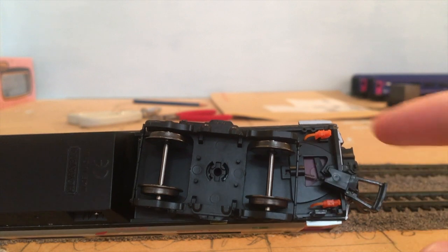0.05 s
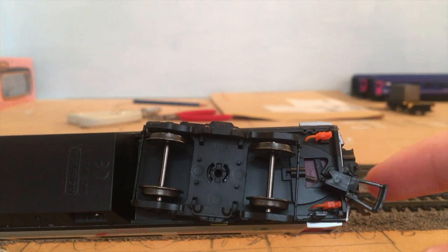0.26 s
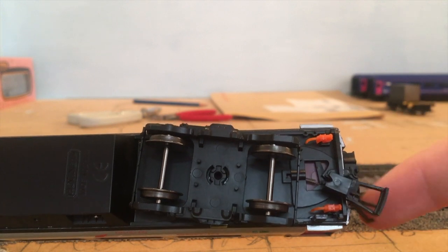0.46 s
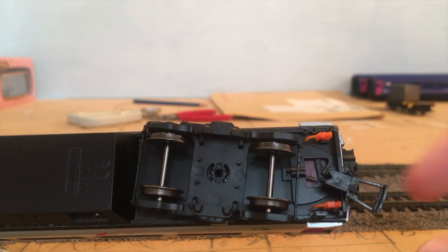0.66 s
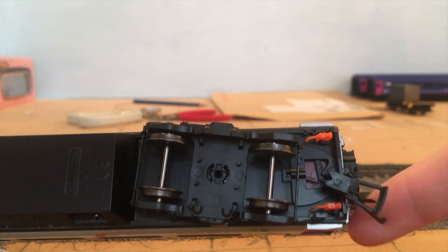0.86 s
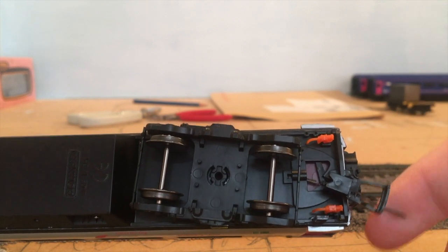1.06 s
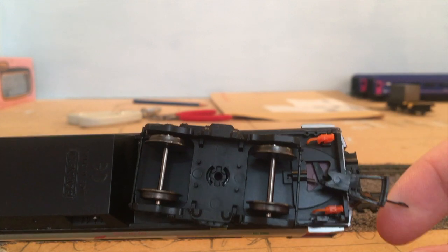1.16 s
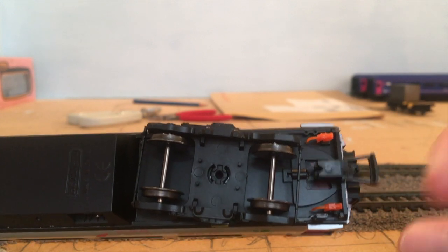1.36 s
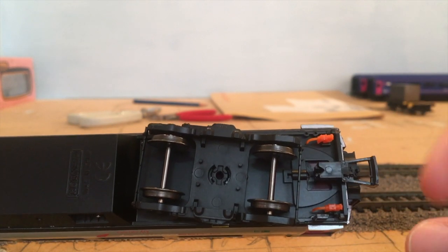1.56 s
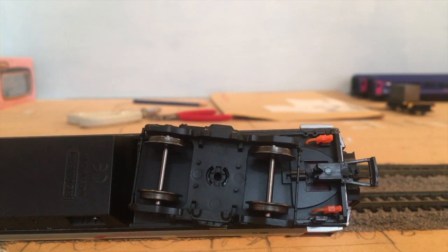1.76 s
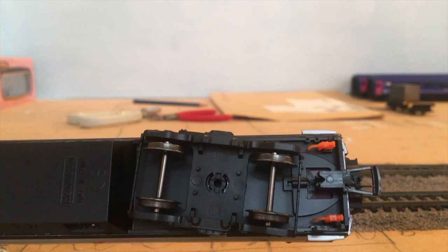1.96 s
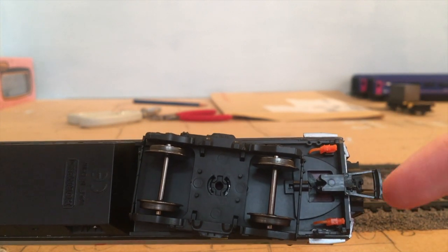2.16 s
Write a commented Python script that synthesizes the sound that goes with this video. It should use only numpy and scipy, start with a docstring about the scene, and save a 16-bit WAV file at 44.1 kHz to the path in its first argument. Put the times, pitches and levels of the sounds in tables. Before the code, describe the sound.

Small plastic clicks as a fingertip pushes a sprung model coach coupling that snaps back

```python
"""In a small room with a low hum, a fingertip pushes the sprung plastic coupling of a model coach aside.
The finger rubs as coloured noise; the arm scrapes in its guide as uneven noise sent through resonances.
Each contact clicks as short fading noises: a hollow body knock, a snap, a bright edge and after-rings.
The arm snaps back with a low thump, a soft scuff fades, and one faint high tick comes last.
The hum is two sine tones over noise for rumble and air; fading noise gives the desk and room echoes."""
import sys
import numpy as np
from scipy import signal
from scipy.fft import rfft, irfft, next_fast_len
from scipy.io import wavfile
from scipy.ndimage import map_coordinates

SR = 44100
rng = np.random.default_rng(int(sys.argv[2]) if len(sys.argv) > 2 else 0)


def store_wav(level_fs):
    """Save 16-bit WAV to argv[1]."""
    pcm = np.round(np.clip(np.atleast_2d(level_fs), -1, 1) * 32767)
    wavfile.write(sys.argv[1], SR, pcm.T.astype(np.int16))


N = 96799  # length in samples
TOP_HZ = 16650  # nothing sounds from here up
ATTACK_S = 0.00098  # rise time of clicks, scuff and tick


def amp(db):
    """Turn decibels into a gain."""
    return 10 ** (np.asarray(db) / 20)


def unit(x):
    """Scale to an rms (average strength) of 1."""
    return x / np.sqrt(np.mean(x ** 2) + 1e-20)


def along(points, hz):
    """Read a curve of (f/Hz, value) points, with frequency on a log axis."""
    f, value = np.transpose(points)
    return np.interp(np.log(hz + 1), np.log(f + 1), value)


def filtered(x, response):
    """Multiply the spectrum of x by a response that depends on frequency."""
    size = next_fast_len(N + SR // 2)  # room to spare, so that the end does not wrap to the start
    spectrum = rfft(x, size) * response(np.fft.rfftfreq(size, 1 / SR))
    return irfft(spectrum, size)[:N]


def noise(colour):
    """Make noise of rms 1 whose spectrum follows (f/Hz, level/dB) points."""
    white = rng.standard_normal(N)
    return unit(filtered(white, lambda hz: amp(along(colour, hz)) * (hz < TOP_HZ)))


def wobble(rate):
    """Draw a smooth random curve through `rate` random points a second."""
    points = rng.standard_normal(int(N * rate / SR) + 4)
    return map_coordinates(points, [np.arange(N) * rate / SR])


def dying(t, t60):
    """Stay full until t = 0, then fall by 60 dB in every t60 seconds."""
    return np.exp(-np.log(1000) * np.maximum(t, 0) / t60)


def strokes(rows, fade_s):
    """Shape the gain of sliding movements: each is a straight ramp in dB with soft ends."""
    t = np.arange(N) / SR
    gain = np.zeros(N)
    for start, end, first_db, last_db in rows:
        ramp = amp(np.interp(t, [start, end], [first_db, last_db]))
        gain += ramp * np.clip(np.minimum(t - start, end - t) / fade_s + 0.5, 0, 1)
    return gain


def resonances(peaks, f):
    """Add up the responses of resonances given as (f/Hz, width/Hz, level/dB)."""
    return sum(amp(db) * 1j * f * width / (centre * centre - f * f + 1j * f * width)
               for centre, width, db in peaks)


def ringing(peaks, size=16384):
    """Make a short loop of noise sent twice through resonances, which deepens the valleys between them."""
    response = resonances(peaks, np.fft.rfftfreq(size, 1 / SR)) ** 2
    return unit(irfft(rfft(rng.standard_normal(size)) * response))


def background():
    """A wavering low hum and a mains tone of fixed pitch that swells and fades lie over rumble and air."""
    # path of the hum: t/s, low hum f/Hz, low hum level/dB before its waver, mains level/dB before a lift
    hum_path = [(0.0, 48.5, -42.5, -63), (0.16, 46, -45, -73), (0.2, 49.2, -44.5, -62.5),
                (1.43, 48.23, -51.5, -53.5), (1.58, 46.14, -50.5, -55.5), (1.63, 49, -43, -50.5),
                (1.71, 53, -53, -54.5), (2.19, 50.25, -45.5, -57.5)]
    # noise colours: f/Hz, relative level/dB
    air_colour = [(100, 3.5), (150, 0), (260, 0.5), (500, -6.5), (1000, -12.5), (2000, -16.5), (4000, -21),
                  (8000, -24.5), (15500, -27.5)]
    rumble_colour = [(15, -10), (33, -0.5), (50, 7), (75, 2.5), (110, -4), (150, -27), (400, -46.5)]
    mains_hz, mains_lift_db = 100.8, 0.5
    waver_db, waver_rate = 2, 10  # typical size, random points per second

    times, *columns = np.transpose(hum_path)
    t = np.arange(N) / SR
    hz, low_db, mains_db = [np.interp(t, times, column) for column in columns]
    low = amp(low_db + waver_db * wobble(waver_rate)) * np.sin(2 * np.pi * np.cumsum(hz) / SR)
    mains = amp(mains_db + mains_lift_db) * np.sin(2 * np.pi * mains_hz * t)
    hum = np.sqrt(2) * (low + mains)  # sqrt(2) makes the tone levels rms levels
    return hum + amp(-60.5) * noise(air_colour) + amp(-52.5) * noise(rumble_colour)


def rubs():
    """Skin drags unevenly over the coupling, so the strength of its noise trembles."""
    # rubs of the fingertip: start t/s, end t/s, first level/dB, last level/dB
    rub_times = [(.02, .06, -57.5, -75), (1.083, 1.115, -58, -57.5), (1.13, 1.165, -58, -62.5),
                 (1.245, 1.27, -61.5, -56), (1.315, 1.356, -44.5, -45.5)]
    # colour of skin on plastic: f/Hz, relative level/dB
    skin_colour = [(150, -26.5), (500, 6.5), (950, 1.5), (1500, 2.5), (2250, 3.5), (3000, -9), (4000, -5.5),
                   (6500, -16.5), (8500, -5), (10500, -16.5), (16000, -20.5)]
    uneven_db, uneven_rate = 3.8, 250  # typical size, random points per second
    drag = unit(noise(skin_colour) * amp(uneven_db * wobble(uneven_rate)))
    return strokes(rub_times, fade_s=0.012) * drag


def clicks():
    """Each contact holds for a few milliseconds of chatter, then the body and the arm ring on and fade."""
    # contacts of the arm: t/s, body knock level/dB, snap level/dB, bright edge level/dB,
    # after-ring level/dB, chatter length/s, ring f/Hz
    contacts = [(0.045, -56.5, -52, -51.5, -59.5, 0.0013, 2125),
                (0.205, -58.5, -60, -74, -60.5, 0.0059, 2070), (0.4688, -44, -33, -38, -46, 0.0018, 2653),
                (0.54, -53.5, -45, -49.5, -53.5, 0.0043, 2070),
                (0.782, -88, -59, -46.5, -53.5, 0.0028, 2289), (0.8522, -46.5, -30, -37, -43, 0.0022, 2587),
                (0.9638, -44.5, -32, -29, -42, 0.0013, 2560), (0.9736, -41, -28.5, -47, -33, 0.0018, 2295),
                (1.088, -64, -49.5, -56, -68, 0.0019, 1740),
                (1.1037, -41.5, -53.5, -56, -49.5, 0.0024, 2680),
                (1.1899, -40.5, -51.5, -66, -48.5, 0.0011, 2100),
                (1.24, -44.5, -59.5, -58, -56, 0.0031, 2150),
                (1.329, -50.5, -44, -51.5, -38.5, 0.0013, 2155),
                (1.3562, -29.5, -24.5, -18, -29, 0.0037, 2079),
                (1.3686, -37.5, -26, -20, -35, 0.0043, 2493), (1.376, -41.5, -25, -22.5, -35, 0.0023, 2430),
                (1.4225, -75, -32.5, -33.5, -45, .0016, 2290),
                (1.619, -60, -61.5, -66.5, -63.5, 0.0075, 2140), (1.691, -48, -62, -64, -76, 0.0021, 2020)]
    # colours of the parts of a click: f/Hz, relative level/dB
    body_colour = [(100, -53.5), (190, -8), (270, -34.5), (400, 2), (660, 1.5), (800, -2.5), (1030, 6),
                   (1400, -2.5), (2200, -4.5), (4000, -36.5)]
    snap_colour = [(600, -44), (1400, -1), (2500, 6.5), (3100, 0.5), (3800, 5.5), (4900, 0), (5900, 5.5),
                   (8000, -17.5), (14000, -47)]
    edge_colour = [(2500, -34.5), (5500, -12.5), (7050, 4), (7900, -1.5), (8900, 7), (10300, -6.5),
                   (12100, 5), (13200, -1.5), (14000, -10), (15500, -8)]
    # resonances of the hollow coach body, then of the coupling and bogie:
    # f/Hz, width/Hz, relative level/dB for one of the two passes
    shell_peaks = [(656, 110, -1), (902, 90, 3.5), (1120, 160, 0)]
    arm_peaks = [(1700, 250, -4), (3650, 150, -5), (5860, 350, -10), (7330, 200, -6.5), (8850, 350, -13),
                 (12080, 230, -12)]
    bend_width_hz, bend_db = 110, 4  # main resonance of the arm; its pitch follows the bend
    body_t60, shell_t60, snap_t60, edge_t60, arm_t60 = 0.036, 0.06, 0.016, 0.0095, 0.049  # s
    shell_db = -8.5  # shell ring against the body knock

    out = np.zeros(N + SR)
    t = np.arange(SR // 5) / SR
    rise = 1 - np.exp(-t / ATTACK_S)
    body, snap, edge = noise(body_colour), noise(snap_colour), noise(edge_colour)
    shell = ringing(shell_peaks)
    for start, body_db, snap_db, edge_db, ring_db, chatter_s, ring_hz in contacts:
        at = round(start * SR)
        arm = ringing(arm_peaks + [(ring_hz, bend_width_hz, bend_db)])
        layers = [(body, body_t60, body_db), (shell, shell_t60, body_db + shell_db),
                  (snap, snap_t60, snap_db), (edge, edge_t60, edge_db), (arm, arm_t60, ring_db)]
        for grain, t60, db in layers:
            shape = rise * dying(t - chatter_s, t60)
            piece = np.resize(np.roll(grain, -at), len(t))  # a different stretch of noise each time
            strength = np.sqrt(np.mean(shape ** 2))  # evens out the luck of the draw
            out[at:at + len(t)] += amp(db) * strength * unit(shape * piece)
    return out[:N]


def slides():
    """Uneven slips of plastic on plastic excite the guide, whose resonances drift in strength."""
    # slides of the arm: start t/s, end t/s, first level/dB, last level/dB
    slide_times = [(.37, .4, -65, -59), (.4, .445, -54, -54), (.445, .468, -56, -42.5),
                   (.783, .83, -48, -53), (.832, .853, -47, -39.5)]
    # resonances of the guide: f/Hz, width/Hz, relative level/dB before the drift
    guide_peaks = [(3280, 230, -1), (3760, 140, 9.5), (6080, 380, -4.5), (6900, 130, -5), (9000, 700, -13),
                   (11400, 310, 2.5)]
    # colour of the gritty scrape: f/Hz, relative level/dB
    grit_colour = [(300, -2), (2000, 0), (5000, -13.5), (10000, 1.5), (13500, -18.5), (16000, -14)]
    slip_db, slip_rate = 2.5, 450  # typical unevenness, random points per second
    drift_db, drift_rate = 4.2, 49.8  # the same for the drift of each resonance

    slips = rng.standard_normal(N) * amp(slip_db * wobble(slip_rate))
    grit = unit(filtered(slips, lambda hz: amp(along(grit_colour, hz))))
    guide = np.zeros(N)
    for peak in guide_peaks:
        ring = filtered(slips, lambda hz: resonances([peak], hz))
        guide += ring * amp(drift_db * wobble(drift_rate))
    scrape = unit(unit(guide) + amp(-4) * grit)
    return strokes(slide_times, fade_s=0.0031) * scrape


def thump(start=1.358, db=-35, hz=205, t60=0.053):
    """The spring's release shakes the whole coach shell at its lowest ring, a fading sine."""
    t = np.maximum(np.arange(N) / SR - start, 0)
    return amp(db) * dying(t, t60) * np.sin(2 * np.pi * hz * t)


def settle(start=1.694, db=-53.0, t60=0.25):
    """A soft, airy scuff fades as the released coach settles."""
    # colour of the scuff: f/Hz, relative level/dB
    scuff_colour = [(450, 4), (700, -1.5), (1350, 5), (2000, -3.5), (3000, -14.5), (4000, 1.5),
                    (5200, -13.5), (16000, -20)]
    t = np.arange(N) / SR - start
    return amp(db) * noise(scuff_colour) * np.clip(t / ATTACK_S, 0, 1) * dying(t, t60)


def thin_tick(start=2.041, db=-44, length_s=0.00059, t60=0.052):
    """One faint, high tick of fading noise sounds once the coupling is at rest."""
    # f/Hz, relative level/dB
    colour = [(1000, -3.5), (4000, -9.5), (5100, -2.5), (5550, 11.5), (6300, -6.5),
              (7400, -5.0), (9500, -9.0), (12000, 2), (16000, -10)]
    t = np.arange(N) / SR - start
    return amp(db) * noise(colour) * np.clip(t / ATTACK_S, 0, 1) * dying(t - length_s, t60)


def room(x):
    """Desk reflections and the room's tail are fading noises; the tail's fade depends on pitch."""
    # fading time of the room: f/Hz, time to fall by 60 dB/s
    room_t60 = [(200, 0.74), (1500, 0.16), (5000, 0.11), (14000, 0.054)]
    room_db, desk_db = -19.5, -15
    desk_t60, delay_s = 0.054, 0.0045  # s; both answers start after the delay

    hz, t, pieces = signal.stft(rng.standard_normal(SR // 2), SR, nperseg=256)
    fade = dying(t, along(room_t60, hz)[:, None])
    tail = signal.istft(pieces * fade, SR, nperseg=256)[1]
    t = np.arange(len(tail)) / SR
    desk = rng.standard_normal(len(t)) * dying(t, desk_t60)
    answer = (amp(room_db) * unit(tail) + amp(desk_db) * unit(desk)) / np.sqrt(len(t))
    delayed = np.pad(x, (round(delay_s * SR), 0))
    return signal.fftconvolve(delayed, answer)[:N]


def scene():
    """Add the coupling on the desk, its echoes and the humming room."""
    near = rubs() + clicks() + slides() + thump() + settle() + thin_tick()
    return (near + room(near) + background())[None]


def record(dry):
    """Dull the very top of the treble and keep nothing from TOP_HZ up."""
    # treble fall: f/Hz, level/dB
    treble_fall = [(14500, 0), (15700, -3), (16100, -22), (16600, -30)]
    return filtered(dry[0], lambda hz: amp(along(treble_fall, hz)) * (hz < TOP_HZ))[None]


dry = scene()
out = record(dry)
store_wav(out)
```